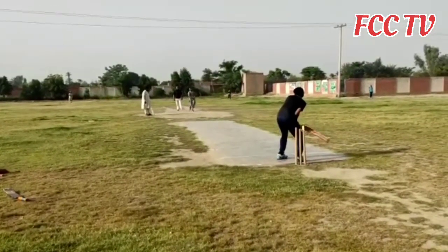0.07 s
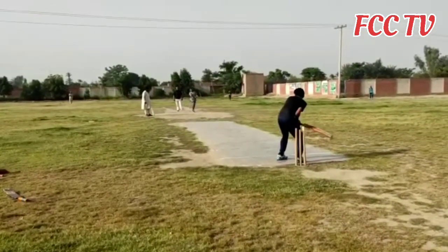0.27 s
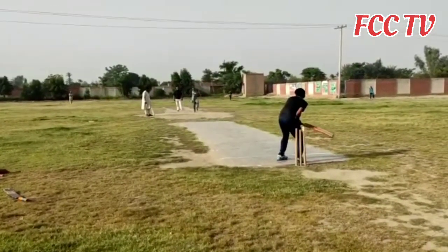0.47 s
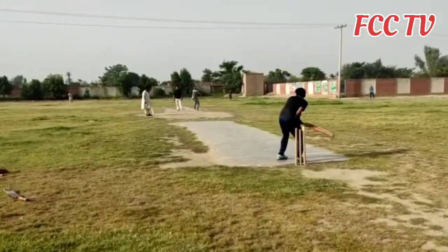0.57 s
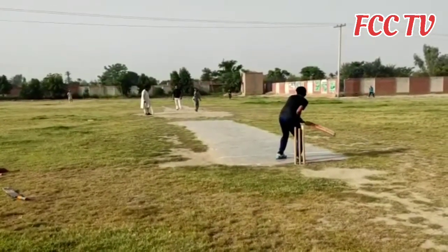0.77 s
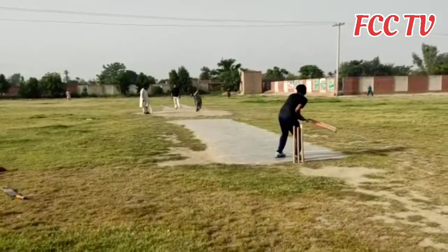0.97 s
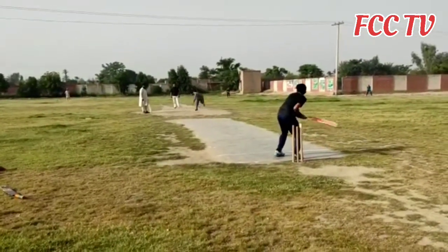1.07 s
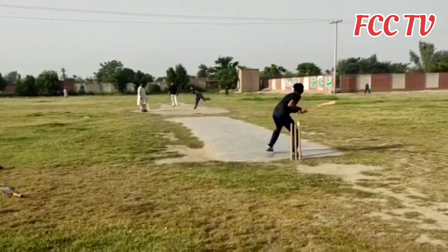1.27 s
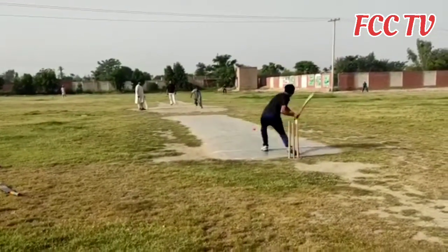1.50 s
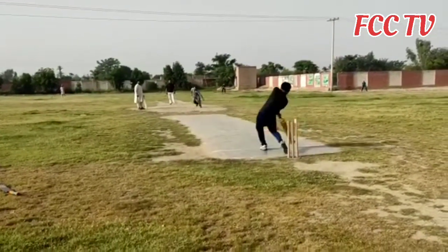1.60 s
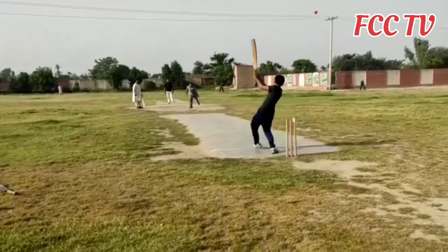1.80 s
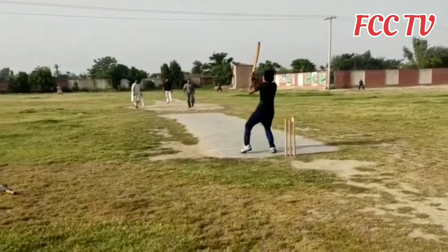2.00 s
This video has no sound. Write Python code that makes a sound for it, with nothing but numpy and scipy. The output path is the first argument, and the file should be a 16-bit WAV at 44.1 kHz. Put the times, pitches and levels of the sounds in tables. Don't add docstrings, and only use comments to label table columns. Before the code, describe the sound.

A cricket bat strikes a ball with one loud, very short woody crack at about 1.7 s, its faint echoes returning from a far wall around 0.16 and 0.32 s later. Before it, quiet open-air hiss, light wind, rustling and a repeating burry bird whistle; faint ground taps near 1.0 s, a foot thud at 1.54 and the ball's bounce on concrete at 1.63. Shoes scuff softly around 1.9 s.

```python
import sys
import numpy as np
from scipy import signal
from scipy.io import wavfile
from scipy.ndimage import uniform_filter1d

SR = 44100
rng = np.random.default_rng(int(sys.argv[2]) if len(sys.argv) > 2 else 0)


def wav_record(signal):
    frames = np.transpose(np.atleast_2d(signal))
    bounded = np.clip(frames, -1, 1)
    quanta = np.round(bounded * 32767).astype(np.int16)
    wavfile.write(sys.argv[1], SR, quanta)


def convert_level_to_amplitude(level_db):
    exponent = np.asarray(level_db, float) / 20
    return 10 ** exponent


N = 90404

BLOW_S, BOUNCE_S = 1.7242, 1.6336
BLADE_LAG_S = 0.00015

# freq_hz, level_db
AIR_EDGE = [(14300, -26), (14600, -70)]


def evened(x):
    return x / np.sqrt(np.mean(x ** 2) + 1e-20)


def read(points, hz):
    f, value = np.transpose(points)
    return np.interp(np.log(hz + 1), np.log(f + 1), value)


def add(mix, s, sound):
    part = mix[:, round(s * SR):][:, :sound.shape[-1]]
    part += sound[..., :part.shape[1]]


def band(x, hz, spread):
    edges = np.clip([hz * (1 - spread), hz * (1 + spread)], 30, SR / 2.1)
    return signal.sosfilt(signal.butter(2, edges, "band", fs=SR, output="sos"), x)


def stereo_noise(size, shared=0):
    noise = rng.standard_normal((size, 2)).T
    return noise + shared * noise[::-1]


def ring(hz, db, t60, t, peak_s=0):
    return convert_level_to_amplitude(db - 60 * t / t60) * np.cos(2 * np.pi * hz * (t - peak_s))


def bat_crack():
    # freq_hz, left_db, right_db, t60_s
    blade = [(216, -16, -17, 0.028), (688, -12.5, -9.5, 0.015), (942, -11, -16, 0.02),
             (1534, -4.5, 1, 0.0079), (2560, -9.5, -5.5, 0.0083), (3080, -18, -7, 0.011),
             (3604, -4.5, 3.5, 0.0086), (3900, -2, 6, 0.0053), (4670, -2.5, -9.5, 0.0082),
             (5700, 1, 8, 0.0044), (6450, 4, -3, 0.0065), (7210, 0.5, 4, 0.006), (7960, 10, 8, 0.0032),
             (10080, -3, -4, 0.0043)]
    contact_s, body_lead_s = 0.0009, 0.0004
    lag_from_hz, lag_to_hz = 2000, 3300
    tick_db, tick_hz, tick_s, tick_spread = -9, 13000, 0.00041, 0.15
    t = np.arange(2000) / SR
    tick = band(rng.standard_normal(len(t)), tick_hz, tick_spread)
    tick = band(tick, tick_hz, tick_spread) * np.exp(-np.abs(t - contact_s) / tick_s)
    crack = convert_level_to_amplitude(tick_db) * tick * np.ones((2, 1))
    for hz, left_db, right_db, t60 in blade:
        lag = np.array([[BLADE_LAG_S * (lag_from_hz < hz < lag_to_hz)], [0]])
        lead = body_lead_s * (hz < lag_from_hz)
        crack += ring(hz, np.array([[left_db], [right_db]]), t60, t, contact_s + lag - lead)
    return crack * convert_level_to_amplitude(-8) * np.minimum(t / contact_s, 1)


def echoes(crack):
    # delay_s, peak_db, left_right_db, centre_hz, smear_s
    near = [(.0024, -30, 6, 8200, 0.0011), (.007, -23, 13, 2650, 0.003), (.002, -42, 0, 12200, .008),
            (.005, -33, 8, 6300, 0.0019), (.001, -36, -1, 12000, .003)]
    # delay_s, peak_db, left_right_db, centre_hz, smear_s
    far = [(.011, -48, 0, 3500, .02), (.012, -53, 0, 5800, .06), (.042, -46, 2, 2700, .008),
           (.082, -47, 0, 1050, .015), (.09, -43, 0, 3000, .014), (.095, -49, 0, 7000, .005),
           (.127, -42, 3, 3100, .004), (.153, -45, 8, 2300, .006), (.15, -48, 0, 110, .003),
           (.1603, -33, 12, 2500, .002), (.1612, -44, 6, 1100, .005), (.1608, -40, 6, 6000, .003),
           (.1608, -49, 3, 10000, .002), (.168, -46, 6, 3200, .025), (.204, -45, 4, 3000, .004),
           (.2115, -44, 4, 3200, .003), (.194, -47, 4, 2600, .005), (.2185, -46, 0, 1300, .003),
           (.305, -50, 3, 2800, .012), (.3238, -31, 3, 3400, .004)]
    spread, damp_s = 0.3, 0.0007
    out = np.zeros((2, N))
    snap = crack * np.exp(-np.arange(crack.shape[1]) / SR / damp_s)
    t = np.arange(6000) / SR
    for delay, db, pan_db, hz, smear in near + far:
        taps = stereo_noise(len(t)) * np.exp(-(t / smear) ** 2)
        back = signal.fftconvolve(snap, taps, axes=1)
        back = band(band(back, hz, spread), hz, spread)
        back = back / np.abs(back).max(axis=1, keepdims=True)
        add(out, BLOW_S + delay, back * convert_level_to_amplitude([[db + pan_db / 2], [db - pan_db / 2]]))
    return out


def swells():
    # delay_s, freq_hz, left_db, right_db, crest_s
    rings = [(.2175, 665, -42.5, -42, 0.0031), (0.25, 866, -43, -44, 0.0024),
             (.0004, 3750, -16, -22, 0.0013), (.0025, 8100, -30, -36, .0008),
             (0.18, 3660, -37, -50, 0.0017), (.161, 1000, -42, -49, .003), (.001, 2535, -14.5, -29, 0.0033),
             (0.00054, 3150, -17, -14, 0.0029), (0.00099, 3560, -19.5, -29, 0.0037),
             (0.0036, 2050, -29.5, -26, 0.0038), (0.0047, 4300, -28, -36, .002),
             (0.00303, 1014, -31.5, -34, 0.0028), (.002, 1540, -35, -28.5, 0.0037),
             (.1603, 2552, -25.5, -40, 0.0023), (.161, 2060, -28.5, -45, 0.0032),
             (.1603, 1430, -35, -45, 0.0028), (.1603, 3114, -36, -48, 0.0025)]
    t, out = np.arange(1500) / SR, np.zeros((2, N))
    for delay, hz, left_db, right_db, crest in rings:
        u = t / crest
        wave = np.sin(2 * np.pi * hz * (t - np.array([[BLADE_LAG_S], [0]])))
        add(out, BLOW_S + delay, convert_level_to_amplitude([[left_db], [right_db]]) * u * np.exp(0.5 - u ** 2 / 2) * wave)
    return out


def bat():
    crack = bat_crack()
    out = echoes(crack) + swells()
    add(out, BLOW_S, crack)
    return out


def push(db, hz):
    left_lag_s, turns = 0.00024, 1.75
    t = np.maximum(np.arange(1000) / SR - [[left_lag_s], [0]], 0)
    shove = np.sin(2 * np.pi * hz * t) * np.exp(-(t * hz / turns * 2) ** 2 / 2)
    return convert_level_to_amplitude(db) * signal.sosfilt(signal.butter(2, 110, "high", fs=SR, output="sos"), shove)


def bounce():
    # push_db, push_hz, shell_db
    push_db, push_hz, shell_db = (-32.5, 313, -30)
    # freq_hz, level_db, t60_s
    shell_modes = [(980, 2, 0.0019), (2540, 2, 0.0032), (4450, -2.5, 0.0059), (7230, 9, 0.003),
                   (11000, -5, 0.0021), (12300, -9, 0.0036)]
    # centre_hz, level_db, decay_s
    shell_grit = [(3580, -44, 0.0023), (700, -50, .002), (5570, -44, .002), (7440, -40, .0025),
                  (4500, -48, 0.0027), (2570, -47, 0.0037), (10800, -54, .002), (15200, -50, .0015)]
    out, t = np.zeros((2, N)), np.arange(1000) / SR
    shell = -sum(ring(*mode, t, 0.000208) for mode in shell_modes)
    shell = shell * convert_level_to_amplitude(shell_db) * np.minimum(t / 0.000081, 1)
    add(out, BOUNCE_S, shell * convert_level_to_amplitude([[-2], [0]]) - push(push_db, push_hz))
    add(out, BOUNCE_S + 0.00059, shell * convert_level_to_amplitude([[-9], [-12]]))
    add(out, BOUNCE_S + 0.0017, -shell * convert_level_to_amplitude([[-9], [-14]]))
    t = np.arange(1500) / SR
    for hz, db, decay in shell_grit:
        grit = band(band(stereo_noise(len(t), 0.37), hz, spread=0.15), hz, spread=0.15)
        add(out, BOUNCE_S, convert_level_to_amplitude(db) * evened(grit) * np.exp(-t / decay))
    return out


def thuds():
    # start_s, push_db, push_hz, knock_db, grit_db
    contacts = [(0.079, -66, 300, -47.5, -45), (0.9783, -47.5, 297, -53.5, -47.5),
                (.993, -43, 278, -44.5, -49.5), (1.102, -58, 289.3, -52, -54), (1.531, -44, 300, -54, -45),
                (1.5344, -56, 230, -52, -41), (1.537, -39, 247, -61, -52), (1.543, -27, 293, -31, -42),
                (1.554, -40, 323, -49, -76), (1.58, -45, 276, -47.5, -75), (1.9432, -41.5, 165, -46, -44)]
    knock_hz, knock_t60_s, grit_hz, grit_s = 893, 0.018, 2830, 0.0021
    out, t = np.zeros((2, N)), np.arange(1000) / SR
    for start, push_db, push_hz, knock_db, grit_db in contacts:
        grit = band(band(stereo_noise(len(t), 0.17), grit_hz, spread=0.88), grit_hz, spread=0.59)
        grit = evened(grit) * np.exp(-t / grit_s)
        knock = ring(knock_hz, knock_db, knock_t60_s, t) * np.minimum(t / 0.00014, 1)
        add(out, start, convert_level_to_amplitude(grit_db) * grit + knock + push(push_db, push_hz))
    return out


def note(length, from_hz, to_hz, db):
    burr_hz, burr_depth, wobble = 122, 0.36, 0.017
    t = np.arange(0, length, 1 / SR)
    shake = evened(uniform_filter1d(rng.standard_normal(6000), size=60))[:len(t)]
    glide = from_hz + (to_hz - from_hz) * t / length
    hz = glide * (1 + wobble * shake * min(from_hz / 3000, 1))
    burr = 1 + burr_depth * np.sin(2 * np.pi * burr_hz * t + 6 * rng.random()) + 0.3 * shake[::-1]
    whistle = np.sqrt(np.sin(np.pi * t / length)) * burr * np.sin(2 * np.pi * np.cumsum(hz) / SR)
    return convert_level_to_amplitude(db) * convert_level_to_amplitude([[3], [0]]) * whistle


def birds():
    # offset_s, length_s, from_hz, to_hz, level_db
    phrase = [(0, 0.048, 6510, 6360, -60), (0.045, 0.027, 4700, 3730, -59),
              (.095, 0.029, 6510, 6350, -61.5), (0.194, 0.104, 3410, 3350, -63),
              (0.272, 0.014, 4280, 3900, -57.5)]
    # start_s, level_db
    songs = [(.075, -5), (.41, -7.5), (.748, -6.5), (1.084, -7), (1.415, -10.5)]
    # start_s, length_s, from_hz, to_hz, level_db
    far_calls = [(0.532, 0.034, 6630, 4820, -65.5), (0.566, 0.021, 4400, 3640, -63),
                 (.585, 0.0835, 3500, 3400, -65.5), (1.177, 0.065, 3400, 3260, -67.5),
                 (1.652, 0.017, 3900, 3800, -58.5), (0.317, 0.04, 3700, 3350, -72),
                 (1.4, 0.018, 3050, 3800, -64), (1.458, 0.0268, 4600, 4300, -66), (1.7, .13, 572, 568, -64)]
    tail_db, tail_s = -3, 0.03
    out = np.zeros((2, N))
    for start, song_db in songs:
        for offset, length, from_hz, to_hz, db in phrase:
            add(out, start + offset, note(length, from_hz, to_hz, db + song_db))
    for start, *call in far_calls:
        add(out, start, note(*call))
    taps = stereo_noise(4000) * np.exp(-np.arange(4000) / SR / tail_s)
    taps = taps / np.linalg.norm(taps[0])
    return out + convert_level_to_amplitude(tail_db) * signal.fftconvolve(out, taps, axes=1)[:, :N]


def scuffs():
    # start_s, length_s, level_db, centre_hz
    rubs = [(1.501, 0.089, -66.5, 6800), (1.9, 0.046, -61.5, 2150), (1.865, 0.072, -58.5, 6600),
            (1.916, 0.016, -51.5, 6000), (1.935, 0.029, -55.5, 6100), (1.535, 0.016, -63.5, 8500),
            (1.81, 0.019, -65.5, 9900), (1.09, 0.033, -69.5, 8400), (1.36, 0.17, -67, 1910)]
    out = np.zeros((2, N))
    for start, length, db, hz in rubs:
        u = np.linspace(0, 1, round(length * SR))
        noise = band(band(stereo_noise(len(u), 0.62), hz, spread=0.32), hz, spread=0.31)
        add(out, start, convert_level_to_amplitude(db) * np.sqrt(np.sin(np.pi * u)) * evened(noise))
    return out


def hiss(tone, patchy_db, size):
    # freq_hz, coherence (-1 to 1)
    likeness = [(40, 0.15), (290, 0.68), (640, 0.22), (1400, -0.24), (3080, -0.17), (6770, 0.82),
                (10000, 0.97), (14900, 0.92)]
    # freq_hz, left_right_db
    balance = [(60, 2.5), (150, -1.0), (380, -2), (950, -0.5), (2370, 6), (5940, 2.5), (14900, 1)]
    frames, hz = 4 * N // size + 5, np.fft.rfftfreq(size, 1 / SR)
    a, b, c, d, patches = rng.standard_normal((frames, len(hz), 5)).T
    patches = uniform_filter1d(uniform_filter1d(patches, size=10, axis=0), size=10, axis=1)
    patches = evened(patches)
    same = np.clip(read(likeness, hz), -1, 1)[:, None]
    left = a + 1j * b
    right = same * left + np.sqrt(1 - same ** 2) * (c + 1j * d)
    lean = read(balance, hz)[:, None] / 2
    level_db = read(tone, hz)[:, None] + patchy_db * patches + np.array([lean, -lean])
    spectra = np.array([left, right]) * convert_level_to_amplitude(level_db)
    return evened(signal.istft(spectra, nperseg=size, noverlap=size * 3 // 4)[1][:, :N])


def rustle():
    # time_s, level_db
    movement = [(0.0, -51), (0.19, -55), (0.26, -54.5), (0.398, -57), (0.699, -85.5), (0.91, -73.5),
                (1.33, -66.5), (1.44, -64.5), (1.73, -54.5), (2.05, -60.5)]
    # freq_hz, level_db
    rustle_tone = [(150, -6.5), (350, -6), (700, -14), (1300, -7), (2300, -2), (3000, -9), (4500, -13.5),
                   (5200, -34), (6100, -30), (7800, -17), (10000, -32)]
    level_db = np.interp(np.arange(N) / SR, *np.transpose(movement))
    return convert_level_to_amplitude(level_db) * hiss(rustle_tone + AIR_EDGE[1:], patchy_db=2.5, size=256)


def wind():
    # freq_hz, level_db
    gust_tone = [(12, -46), (20, 40), (49, -6), (163, -6.5), (333, -15), (441, -29), (700, -24), (910, -34),
                 (1540, -120)]
    return convert_level_to_amplitude(-57) * hiss(gust_tone + [(1500, -68)], patchy_db=2, size=1024)


def air():
    # freq_hz, level_db
    air_tone = [(400, -6), (1900, -3.5), (4300, -8.5), (5300, -13.5), (5900, -12), (6900, -14),
                (7900, -6.5), (9600, -24), (14000, -20)]
    return convert_level_to_amplitude(-63.5) * hiss(air_tone + AIR_EDGE, patchy_db=0.4, size=512)


def scene():
    return bat() + bounce() + thuds() + birds() + scuffs() + rustle() + wind() + air()


def roll_off(x):
    return signal.sosfilt(signal.butter(12, 16000, fs=SR, output="sos"), x)


def record(dry):
    ceiling, top_db = 0.95, -26
    soft = ceiling * np.tanh(dry / ceiling)
    edge_taps = signal.firwin(101, 14300, fs=SR)
    limited = signal.oaconvolve(soft, edge_taps[None], "same")
    return roll_off(limited + convert_level_to_amplitude(top_db) * (soft - limited))


dry = scene()
out = record(dry)
wav_record(out)
```